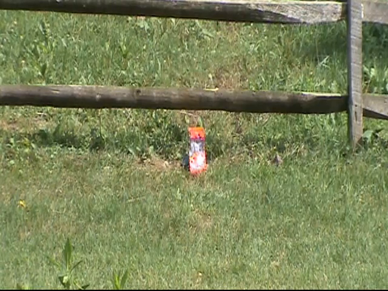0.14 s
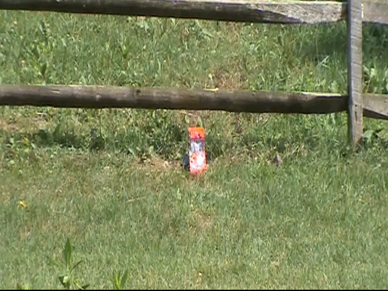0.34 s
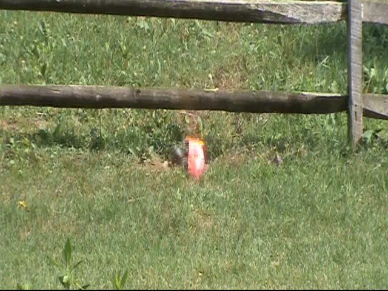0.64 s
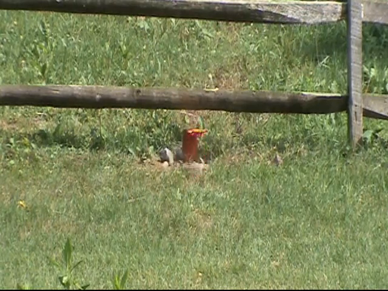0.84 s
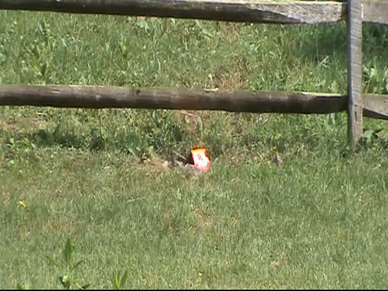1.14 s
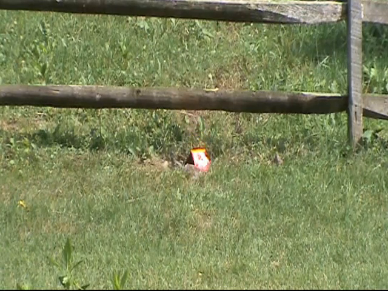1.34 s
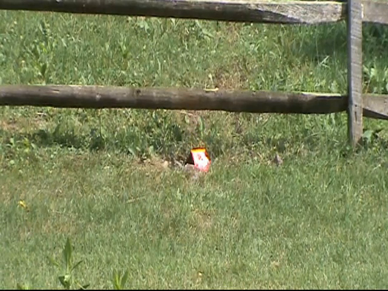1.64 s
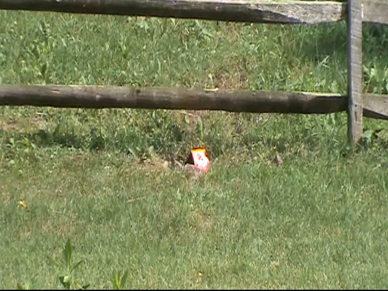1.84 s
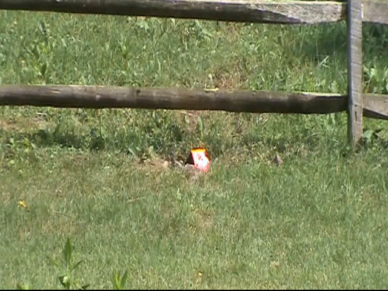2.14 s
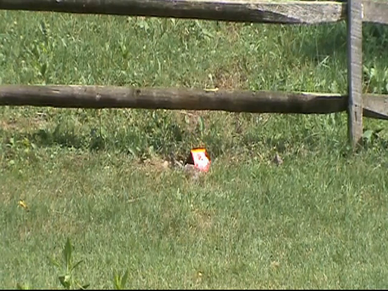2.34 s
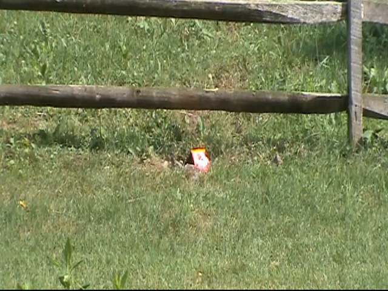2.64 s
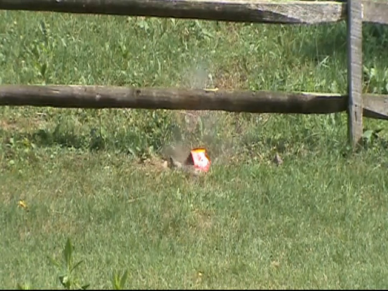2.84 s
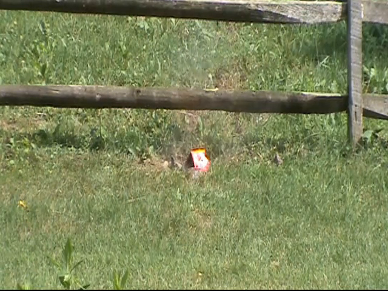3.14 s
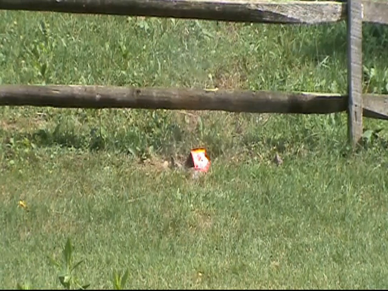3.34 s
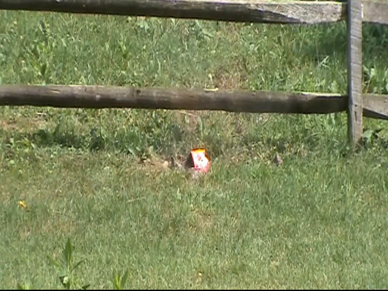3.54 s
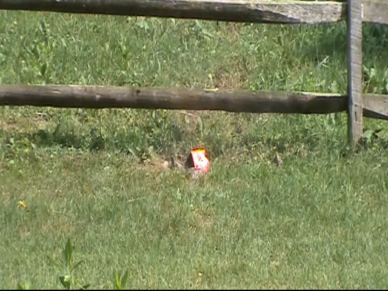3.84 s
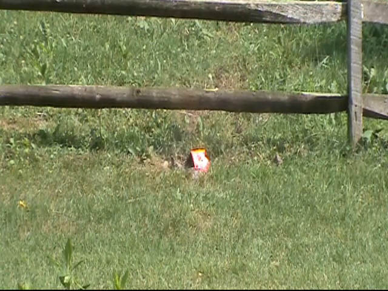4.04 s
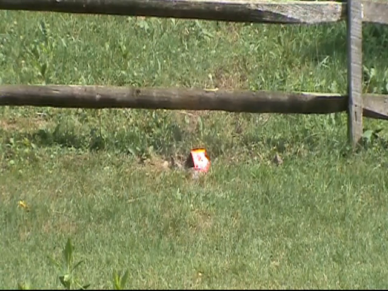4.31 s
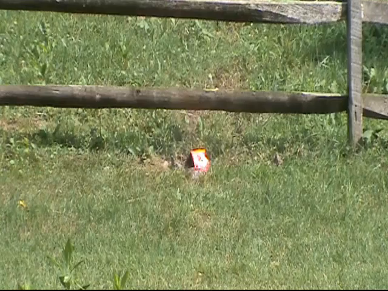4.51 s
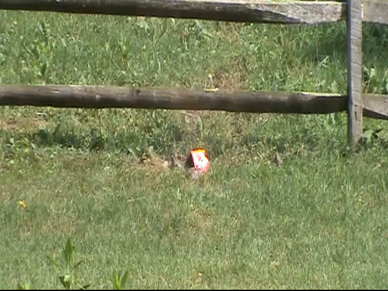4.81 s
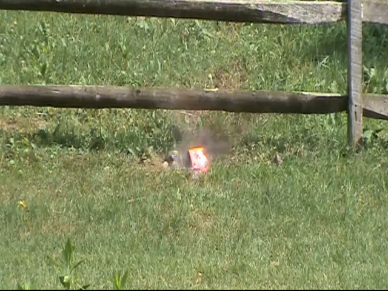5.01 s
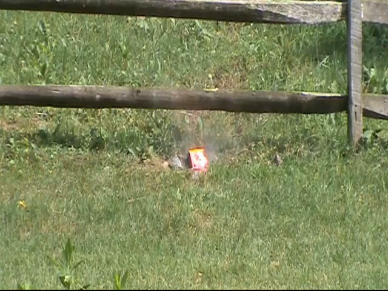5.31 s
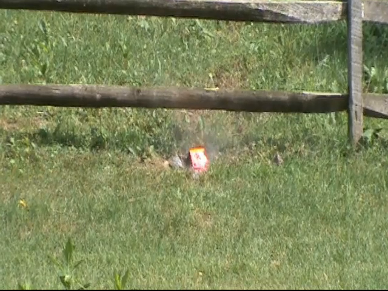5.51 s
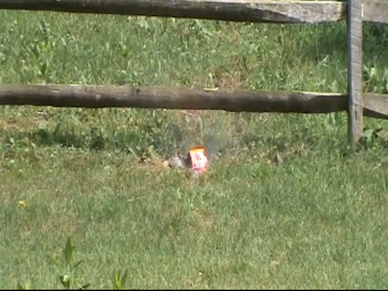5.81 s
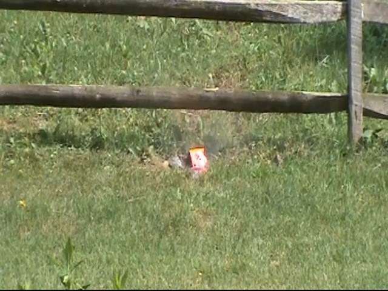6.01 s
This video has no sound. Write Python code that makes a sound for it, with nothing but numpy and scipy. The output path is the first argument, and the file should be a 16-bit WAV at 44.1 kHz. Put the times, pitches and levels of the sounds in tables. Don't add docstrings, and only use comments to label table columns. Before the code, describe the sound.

Three slowly spaced pistol shots crack outdoors, each followed by a long rolling echo, with brass cases ticking down and a faint engine far off.

```python
import sys
import numpy as np
from scipy import signal
from scipy.fft import rfft, irfft
from scipy.io import wavfile

SR = 44100
rng = np.random.default_rng(int(sys.argv[2]) if len(sys.argv) > 2 else 0)


def amplitude_ratio(level_db):
    exponent = np.asarray(level_db, float) / 20
    return 10 ** exponent


def master_out(mix):
    frames = np.transpose(np.atleast_2d(mix))
    ceiling = np.clip(frames, -1, 1)
    pcm = np.round(ceiling * 32767).astype(np.int16)
    wavfile.write(sys.argv[1], SR, pcm)


N = 271656

# blast time in seconds, strength in dB.
SHOTS = [
    (-1.0, -0.15),
    (.6974, 1.63),
    (2.8979, 1.5),
    (5.0321, 1.07),
]


def at_hz(points, hz):
    table_hz, values = np.transpose(points)
    return np.interp(np.log(hz), np.log(table_hz), values)


def band(x, low_hz, high_hz):
    sos = signal.butter(2, [low_hz, high_hz], "band", fs=SR, output="sos")
    return signal.sosfilt(sos, x + 1e-18)


def ring(clicks, hz, t60_s):
    r = amplitude_ratio(-60 / (t60_s * SR))
    w = 2 * np.pi * hz / SR
    return signal.lfilter([0, np.sin(w)], [1, -2 * r * np.cos(w), r * r], clicks + 1e-18)


def fade(clicks, t60_s):
    return signal.lfilter([1], [1, -amplitude_ratio(-60 / (t60_s * SR))], clicks + 1e-18)


def clicks_at(seconds, heights):
    out = np.zeros(N)
    at = np.round(np.asarray(seconds) * SR).astype(int)
    keep = (at >= 0) & (at < N)
    np.add.at(out, at[keep], np.asarray(heights)[keep])
    return out


def left_right(mid, side):
    return mid + side * np.array([[1], [-1]])


def since_shot():
    t = np.arange(N) / SR
    starts = np.transpose(SHOTS)[0]
    last = np.searchsorted(starts, t) - 1
    return last, t - starts[last]


def crack_blast_and_echoes():
    # seconds after the blast, pulse peak in dB.
    near = [(.0006, -21), (.0036, -12), (.0066, -13), (.0096, -12), (.0126, -19), (.0166, -11),
            (.0206, -14), (.0321, -7), (.0366, -9), (.0396, -12), (.0446, -9), (.0516, -12), (.0556, -9),
            (.0596, -9), (.0676, -14), (.0786, -11), (.0856, -9), (.0926, -9), (.1176, -12)]
    # seconds after the blast, pulse peak in dB.
    far = [(0.141, -21), (.245, -12.5), (0.33, -28), (.469, -9), (.516, -20), (.696, -20.5), (.802, -25),
           (.949, -32), (1.054, -40)]
    crack_s, crack_db = -0.0044, -33
    burst_t60_s = 0.02
    near_s = np.append(crack_s, np.transpose(near)[0])
    all_s, all_db = np.vstack([[(crack_s, crack_db)], near, far]).T
    lean = rng.uniform(-1, 1, len(all_s))

    def carried(crack_part_db, start_db, sag_db_per_s):
        return np.where(near_s < 0, crack_part_db, start_db - sag_db_per_s * near_s)

    def train(delays_s, heights):
        return sum(clicks_at(shot_s + delays_s, heights * amplitude_ratio(db)) for shot_s, db in SHOTS)

    def pulse(clicks):
        return band(ring(clicks, 713, 0.0055), 223, 1420)

    mid = pulse(train(all_s, amplitude_ratio(all_db + 1.9)))
    side = pulse(train(all_s, lean * amplitude_ratio(all_db + 4.5)))
    out = left_right(mid, side)

    thump_db = carried(-33, -19, 190) - 20
    thump = band(ring(train(near_s, amplitude_ratio(thump_db)), 230, 0.01), 68, 450)
    out = out + left_right(thump, -0.6 * thump)

    snap = ring(train(near_s[:1], amplitude_ratio([-17])), 4900, 0.0095)
    out = out + band(snap, 3000, 8000)

    rattle_db = carried(-17.5, -9, 64) - 2.5
    hiss_db = carried(-18, -13.5, 112) - 3
    for db, low_hz, high_hz in [(rattle_db, 1000, 6000), (hiss_db, 6000, 15000)]:
        mid, side = band(rng.standard_normal((2, N)), low_hz, high_hz)
        envelope = np.sqrt(fade(train(near_s, amplitude_ratio(2 * db)), burst_t60_s / 2))
        out = out + envelope * left_right(mid, amplitude_ratio(-4) * side)
    return out


def gas_push():
    # seconds after the blast, peak in dB, Hz, t60 in seconds.
    pushes = [
        (.001, -15.5, 166, 0.046),
        (.005, -8, 114, 0.019),
        (0.013, -20, 70, .06),
        (0.035, -19, 140, 0.058),
        (.14, -30, 124, .1),
        (0.248, -34, 115, 0.083),
    ]
    shot_s, shot_db = np.transpose(SHOTS)
    mid = 0
    for late_s, peak_db, hz, t60_s in pushes:
        mid = mid + ring(clicks_at(shot_s + late_s, amplitude_ratio(shot_db + peak_db - 5)), hz, t60_s)
    mid = band(mid, 48, 500)
    return left_right(mid, 0.71 * mid)


def roll_and_air():
    # seconds after the blast, level in dB.
    roll_curve = [(.02, -17), (.12, -20.5), (.17, -18), (.33, -20), (.55, -23.5), (.85, -31), (1.25, -40),
                  (1.9, -54), (2.2, -57)]
    # Hz, dB per band.
    roll_colour = [(30, -66), (70, -28.5), (120, -19.5), (190, -21.5), (280, -6), (450, 1), (900, 7),
                   (1500, -3), (2400, -0.5), (3500, -1), (4900, 4), (6800, -0.5), (10000, 4.5), (15500, -6)]
    # Hz, share.
    same_each_shot = [(100, .9), (600, .96), (2400, .6), (5000, .25), (10000, .1)]
    # Hz, dB.
    field_db = [(500, -2), (2400, 0.83), (4800, -3), (10500, -10.5)]
    # Hz, dB per second.
    air_loss = [(100, 12.5), (500, -2.6), (2400, 11), (4800, 26), (10500, 48)]
    # Hz, dB.
    slope_swell = [(120, 1), (300, 5.5), (700, -0.5), (2000, 0.9)]
    # Hz, dB.
    grass_dip = [(120, -2.8), (300, 4.5), (700, 5.5), (1500, .5)]
    # Hz, level spread in dB.
    lump_spread = [(300, 2), (1000, 2.27), (3000, 1.05), (10000, 0.9)]
    # Hz, dB per band.
    air_colour = [(25, -25), (60, -1.5), (120, -10.5), (250, -1.5), (500, -1), (1000, -0.5), (2400, -10.5),
                  (5000, -11), (10000, -15), (15500, -11.5)]
    # Hz, dB.
    side_db = [(30, -12), (100, -11), (300, -13), (700, -7.5), (2000, -6.5), (3500, -11.5), (8000, -6),
               (14000, -8.5)]
    # Hz, share of the sum in the difference.
    lean_right = [(100, -.05), (300, -0.17), (700, -0.23), (1200, 0.026)]
    air_db, lean_lag_samples, lumps_per_s = -40.5, 18, 35
    loss_starts_s, loss_eases_s = 0.28, 2.43

    last, since_s = since_shot()
    roll_db = np.interp(since_s, *np.transpose(roll_curve)) + np.transpose(SHOTS)[1][last]
    far_s = np.maximum(since_s - loss_starts_s, 0)
    path_s = far_s / (1 + far_s / loss_eases_s)
    grass = np.exp(-((since_s - 0.24) / 0.1) ** 2)
    slopes = np.exp(-((since_s - 0.64) / 0.28) ** 2)
    onset = 1 - np.exp(-since_s / 0.0017)
    lumps = [np.interp(since_s * lumps_per_s, np.arange(len(row)), row)
             for row in rng.standard_normal((8, 3 * lumps_per_s))]
    landscape = rng.standard_normal((2, 2, 3 * SR))[:, :, (since_s * SR).astype(int)]
    weather = rng.standard_normal((2, 2, N))

    edges_hz = 27 * 2 ** np.arange(0, 9.4, 1 / 3)
    out = 0
    for k, (low_hz, high_hz) in enumerate(zip(edges_hz, edges_hz[1:])):
        hz = np.sqrt(low_hz * high_hz)
        even = np.sqrt(SR / 2 / (high_hz - low_hz))
        level_db = roll_db + at_hz(field_db, hz) - at_hz(air_loss, hz) * path_s
        level_db = level_db + at_hz(slope_swell, hz) * slopes - at_hz(grass_dip, hz) * grass
        level_db = level_db + at_hz(lump_spread, hz) * lumps[k // 4]
        roll = onset * amplitude_ratio(level_db + at_hz(roll_colour, hz) - 13)
        air = amplitude_ratio(at_hz(air_colour, hz) + air_db - 22.5)
        same = at_hz(same_each_shot, hz)
        fresh = np.sqrt(roll ** 2 * (1 - same ** 2) + air ** 2)
        repeated = same * roll * band(landscape[k % 2], low_hz, high_hz)
        mid, side = repeated + fresh * band(weather[k % 2], low_hz, high_hz)
        leaning = at_hz(lean_right, hz) * np.roll(mid, lean_lag_samples)
        out = out + even * left_right(mid, amplitude_ratio(at_hz(side_db, hz)) * side + leaning)
    return out


def casing(bounces, brass, fading, rings_db, pan_db):
    split_hz = 24
    noise = band(rng.standard_normal(N), 4300, 11500)
    out = np.zeros((2, N))
    pan = amplitude_ratio(np.array([[pan_db], [-pan_db]]) / 2)
    for s, tick_db, ring_db, tick_hz in bounces:
        start = round(s * SR)
        click = clicks_at([0], [amplitude_ratio(tick_db)])[:min(SR // 3, N - start)]
        stop = start + len(click)
        hit = amplitude_ratio(2.5) * ring(click, tick_hz, 0.0046)
        soft = amplitude_ratio(fading * (tick_db - bounces[0][1]))
        hiss = amplitude_ratio(-6.0) * fade(click, 0.015) + amplitude_ratio(-32.5) * fade(click, 0.65)
        hit = hit + soft * noise[start:stop] * hiss
        for db, (hz, t60_s) in zip(rings_db, brass):
            tone = ring(click, hz, t60_s / 4) + 0.35 * ring(click, hz, t60_s)
            tone = tone + 0.3 * ring(click, hz + split_hz, t60_s)
            hit = hit + amplitude_ratio(ring_db + db - 7) * tone
        out[:, start:stop] += hit * pan
    return out


def brass_cases():
    # start in seconds, tick peak in dB, ring in dB above it, tick Hz.
    first_case = [(.0685, -25, -18, 4640), (.0775, -32.5, -10, 6000), (.080, -32, -11, 4800),
                  (.3018, -26, -22, 4740), (.4006, -32, -30, 4630), (.4854, -40, -32, 4700),
                  (.495, -52, -30, 6940), (.5567, -44, -26, 4780), (.6146, -48, -30, 4700)]
    later_cases = [
        (3.7764, -18, -25, 5570),
        (5.5953, -15.5, -24, 4630),
        (6.0063, -39, -33, 8200),
    ]
    case_on_edge = [
        (5.6167, -23, -17, 6300),
        (5.668, -46, 5, 6800),
    ]
    # Hz, t60 in seconds.
    first_brass = [(15170, .2), (11280, .2)]
    later_brass = [(14970, .14), (11710, .12)]
    out = casing(first_case, first_brass, fading=0.95, rings_db=(0, -11), pan_db=9)
    out = out + casing(later_cases, later_brass, fading=0, rings_db=(0, -19), pan_db=5.0)
    return out + casing(case_on_edge, later_brass, fading=0, rings_db=(-28, 0), pan_db=12.0)


def dry_ticks():
    # start in seconds, peak in dB, Hz.
    ticks = [(0.826, -10, 4900), (1.967, -53, 6850), (2.068, -59, 7050), (2.109, -63, 7000),
             (4.351, -57, 9500), (4.4037, -36.5, 4600), (4.408, -57, 7600), (4.9856, -36.5, 4660),
             (5.598, -22, 4900)]
    bounces = [(s, db, 0, hz) for s, db, hz in ticks]
    return casing(bounces, [], fading=0, rings_db=(), pan_db=6.0)


def board():
    # start in seconds, peak in dB.
    knocks = [(4.353, -42), (4.361, -32), (4.402, -24.5), (4.4044, -25), (4.408, -32), (4.414, -43),
              (4.421, -35), (4.430, -37), (4.439, -38), (4.453, -38), (5.619, -20)]
    # Hz, level in dB, t60 in seconds.
    modes = [(577, -3, 0.048), (1815, -0.5, 0.024), (2260, -5, 0.007), (2900, -6, 0.012)]
    s, peak_db = np.transpose(knocks)
    mid = sum(ring(clicks_at(s, amplitude_ratio(peak_db + db - 9)), hz, t60_s) for hz, db, t60_s in modes)
    return left_right(mid, 0.27 * mid)


def thud():
    # start in seconds, peak in dB, Hz.
    landings = [
        (5.613, -23, 212),
        (5.625, -28.5, 130),
        (5.639, -30, 85),
    ]
    return sum(band(ring(clicks_at([s], [amplitude_ratio(db - 1)]), hz, 0.066), 40, 400) for s, db, hz in landings)


def engine_and_hums():
    # time in seconds, level in dB.
    third_order = [(0, -57), (.3, -50.5), (.65, -63), (1.5, -62), (2.1, -47.5), (2.35, -61.5),
                   (2.68, -45.5), (3.3, -53.5), (4.0, -44), (4.55, -42), (4.95, -49), (6.16, -70)]
    # multiple of the turning rate, level in dB.
    orders = [(1, -11), (2, -17), (3, -1), (4, -12), (5, -9.5), (6, -8.5), (8, -7.5)]
    hum_hz = [100.2, 132.5]
    hum_level = [-54, -57.5]
    t = np.arange(N) / SR
    third_db = np.interp(t, *np.transpose(third_order))
    duck_db = 16 * np.exp(-(since_shot()[1] / 0.65) ** 2)
    run_down_db = 9 * np.clip((t - 2.63) / 0.37, 0, 1)
    hum_db = [hum_level[0] - run_down_db - duck_db, hum_level[1] - duck_db]

    def waver(depth_db):
        return depth_db * np.interp(t, np.arange(60) / 9, rng.standard_normal(60))

    third_hz = 216.6 - 1.3 * t
    turn = 2 * np.pi * np.cumsum(third_hz) / 3 / SR
    out = np.zeros(N)
    for order, db in orders:
        out += amplitude_ratio(third_db + db - 4.5 + waver(0.84)) * np.sin(order * turn + order)
    for hz, db in zip(hum_hz, hum_db):
        out += amplitude_ratio(db - 2.0 + waver(3.2)) * np.sin(2 * np.pi * hz * t)
    return out


def scene():
    shots = crack_blast_and_echoes() + gas_push() + roll_and_air()
    small_hits = brass_cases() + dry_ticks() + board() + thud()
    return shots + small_hits + engine_and_hums()


def top_cut(x):
    return signal.sosfilt(signal.butter(12, 16620, fs=SR, output="sos"), x)


def record(dry):
    cross_s, cross_share, cross_cut_hz = 0.0004194, 0.82, 4300
    hz = np.arange(N // 2 + 1) * SR / N
    delay = np.exp(-2j * np.pi * hz * cross_s)
    cross = cross_share * delay / np.sqrt(1 + (hz / cross_cut_hz) ** 2)
    mixed = dry + irfft(rfft(dry[::-1]) * cross, N)
    limited = 1.051 * np.tanh(mixed / 0.87)
    low_pass = signal.ellip(8, 0.5, 36, 15700, fs=SR, output="sos")
    return top_cut(signal.sosfilt(low_pass, limited))


dry = scene()
out = record(dry)
master_out(out)
```